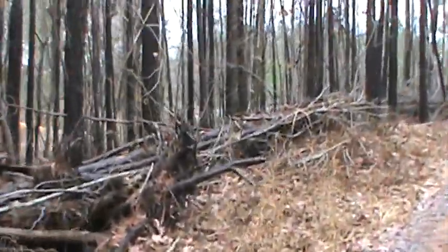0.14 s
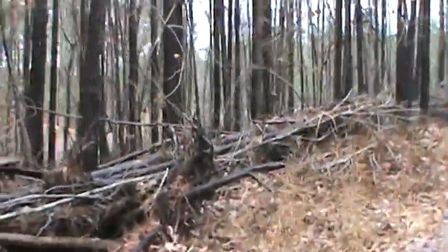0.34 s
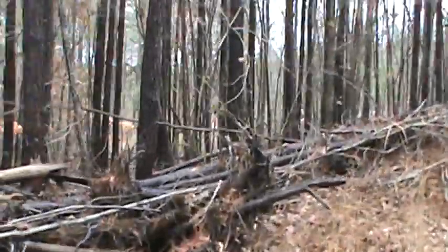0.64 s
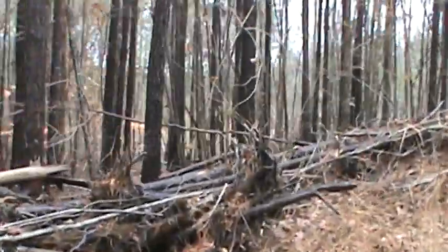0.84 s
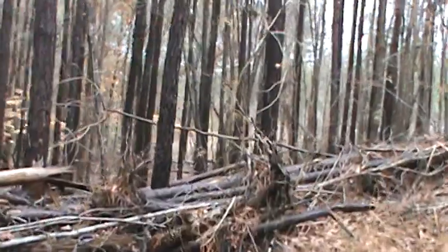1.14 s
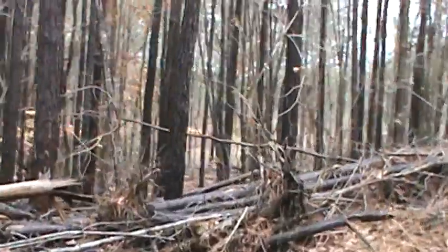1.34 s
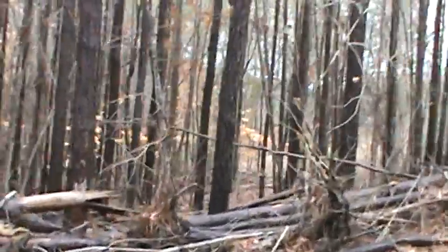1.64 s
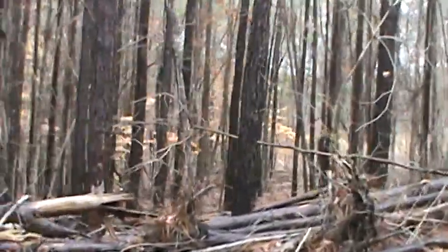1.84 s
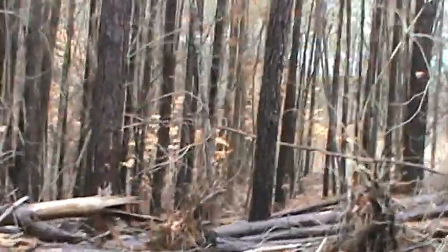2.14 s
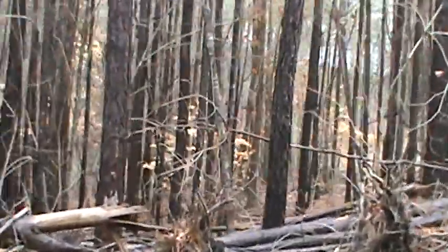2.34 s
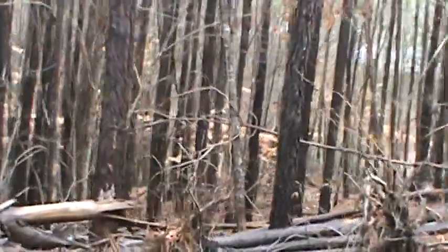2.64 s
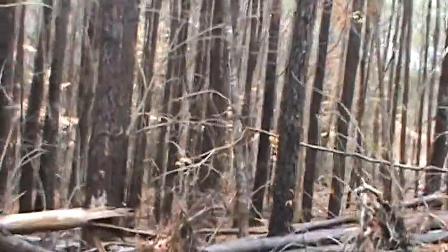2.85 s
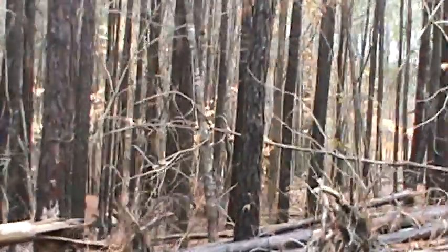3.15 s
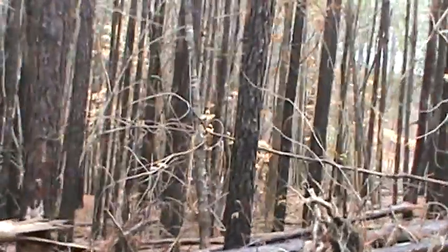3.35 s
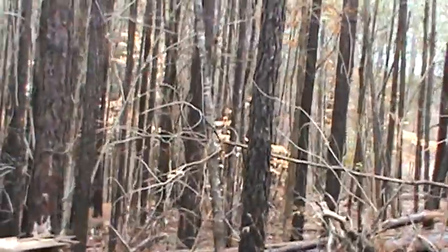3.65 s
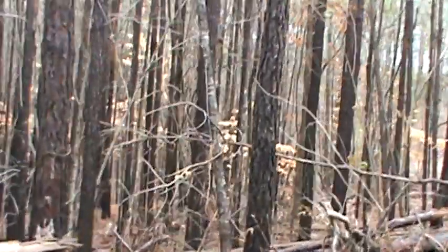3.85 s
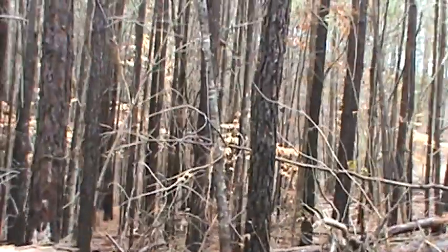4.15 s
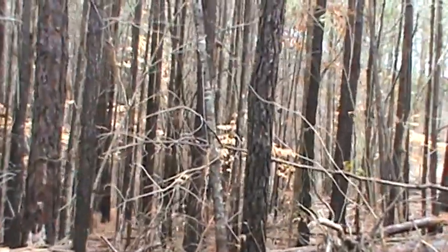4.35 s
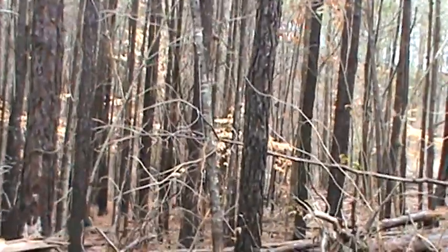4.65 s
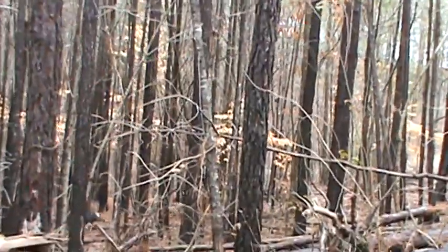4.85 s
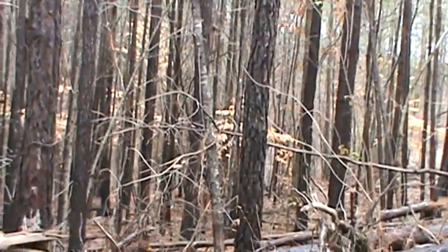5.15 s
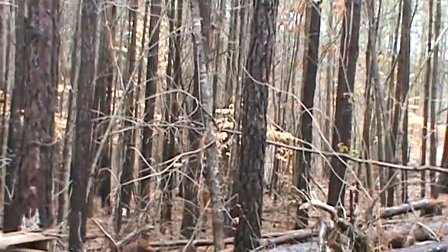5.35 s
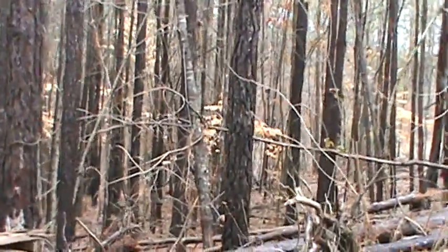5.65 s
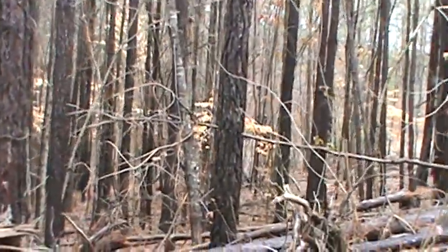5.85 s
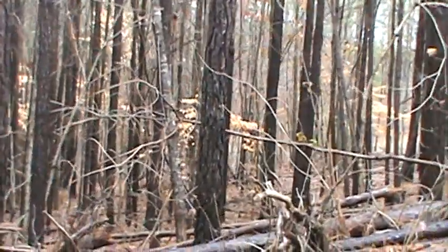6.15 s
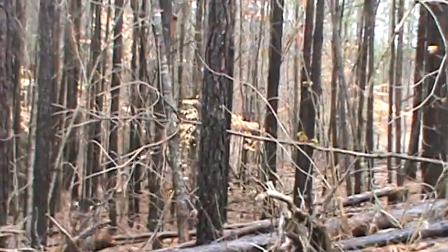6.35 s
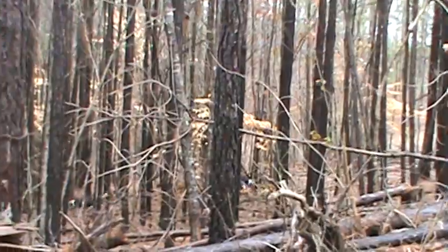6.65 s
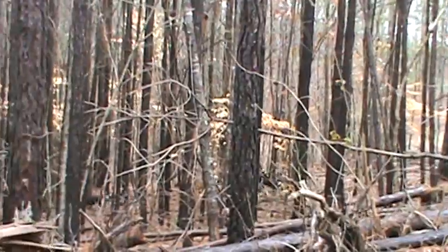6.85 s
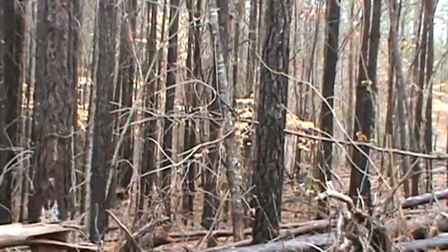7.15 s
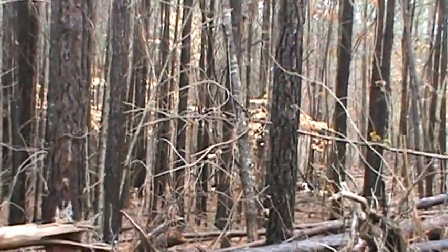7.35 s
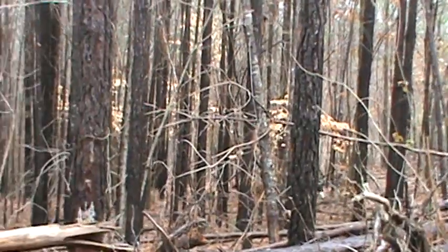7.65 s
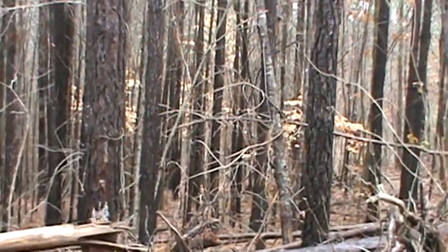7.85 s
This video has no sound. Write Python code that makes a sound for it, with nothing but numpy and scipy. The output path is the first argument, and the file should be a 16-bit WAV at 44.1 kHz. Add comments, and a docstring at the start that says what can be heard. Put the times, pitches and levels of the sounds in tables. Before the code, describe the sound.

Hunting dogs call in pine woods for eight seconds, each short bay or yip trailing an echo among the trunks. A hoarse, rasping hound and a high yipping one open, joined within half a second by a higher hound and a clear, steady one, all overlapping left of centre. A hand bumps the microphone dully at the start and several times around 0.7 seconds. Close by, dry leaves rustle underfoot and twigs snap from 0.3 seconds, again near 2 seconds, and loudest in a sharp cluster around 3 seconds. The leaves settle after 4 seconds. The clear hound stops just after 5 seconds; the others continue, sparser, slightly softer and nearer the middle, with one sharper yip at about 7.5 seconds. Faint outdoor hiss and a very thin, high electronic whine lie underneath throughout.

```python
"""Hounds on a trail in pine woods, 8 s, over faint air hiss and a thin electronic whine.
A hoarse hound and a yipping one open, as dry leaves rustle underfoot and a hand bumps the microphone
housing. A higher hound joins at 0.2 s, twigs snap from 0.3 s, a clear hound enters at 0.4 s. Each call is
vocal-fold tone plus rasp, scattered into a tail by the trunks. More bumps near 0.7 s; snaps peak near 3 s.
The leaves settle after 4 s, the clear hound stops after 5 s; the rest call on, now nearer the middle."""
import sys
import numpy as np
from scipy import signal
from scipy.fft import rfft, irfft, next_fast_len
from scipy.io import wavfile
from scipy.ndimage import uniform_filter1d, map_coordinates

SR = 44100
rng = np.random.default_rng(int(sys.argv[2]) if len(sys.argv) > 2 else 0)


def transcribe(signal):
    """Save signal, clipped to [-1, 1], as a 16-bit WAV file at the path in sys.argv[1]."""
    frames = np.atleast_2d(signal).T
    limited = np.clip(frames, -1, 1)
    pcm = np.round(limited * 32767).astype(np.int16)
    wavfile.write(sys.argv[1], SR, pcm)


N = 353241

# Levels are relative within each source; crest_s counts from the start of its call.
# open-air spectrum: freq_hz, density_db
AIR_SPECTRUM = [(15, -40), (25, -39), (70, -8), (250, -16.5), (500, -15), (1200, -14), (3200, -23),
                (7000, -21.5), (12000, -22.5), (15700, -37)]
# electronics whine: freq_hz, rms_db
WHINE_TONES = [(15734, -67)]
# throat response on the overtones: freq_hz, gain_db
THROAT_RESPONSE = [(1000, 0), (1300, 0), (1900, -9), (2600, -10), (3200, -21), (3800, -32), (5400, -46),
                   (7800, -56), (15000, -75)]
# rasp spectrum: freq_hz, density_db
RASP_SPECTRUM = [(450, -24), (700, 8), (880, -7.5), (1100, 2), (1300, 5), (1450, -4), (1680, -1),
                 (2070, -5.5), (2600, -5), (3050, -13.5), (3450, -23.5), (5350, -31), (7800, -23.5),
                 (11000, -31), (15500, -52)]
# decay among the trunks: freq_hz, t60_s
WOODS_DECAY = [(300, 2.45), (650, 0.84), (1300, 0.93), (2600, 0.77), (8000, 0.66)]
# hoarse bays: start_s, length_s, crest_s, tone_db, upper_db, opening_hz, held_hz, breakup_s
HOARSE_CALLS = [(0, .12, 0.039, -8, -14.5, 666.4, 636, 0.043),
                (0.15, 0.18, 0.12, -14, -20, 635.3, 664.5, .04),
                (0.655, 0.21, 0.068, -13, -18, 558.3, 663, 0.03),
                (0.8, .15, 0.08, -13, -15.5, 665, 648.3, 0.031),
                (1.13, .14, 0.016, -13.5, -16.5, 651, 664.2, 0.042),
                (1.41, 0.18, 0.051, -14.5, -16, 595.6, 630.7, 0.042),
                (1.76, 0.19, 0.06, -23, -17, 611.4, 614.2, .04),
                (1.91, 0.45, 0.025, -19.5, -24.5, 646.3, 658.4, 0.047),
                (2.4, 0.2, 0.038, -20.5, -19.5, 689.5, 633, 0.051),
                (2.54, 0.17, 0.03, -16, -18, 665, 656, 0.037),
                (2.9, 0.095, .03, -21.5, -25, 654, 692, 0.033),
                (2.97, 0.23, 0.092, -18, -18, 660, 663.5, 0.041),
                (3.29, 0.17, 0.056, -12.5, -12.5, 545.7, 651.6, 0.093),
                (3.44, 0.21, 0.11, -10, -13.5, 560, 675.7, .05),
                (3.93, 0.21, 0.068, -15, -15.5, 531.4, 643, 0.042),
                (4.29, .19, .08, -18, -14.5, 598, 642.6, 0.067),
                (4.68, 0.15, 0.043, -17, -18.5, 638.3, 639, 0.081),
                (5.22, .165, 0.085, -18, -15.5, 509.6, 644.4, 0.16),
                (5.44, 0.17, 0.069, -16.5, -17.5, 542.7, 673.3, 0.056),
                (6.165, 0.22, 0.098, -17.5, -18, 516, 661, 0.042),
                (6.615, 0.14, 0.051, -20, -15.5, 525.8, 677, 0.035),
                (6.915, 0.2, 0.1, -17, -15, 551, 670.4, 0.033),
                (7.27, 0.18, 0.14, -18, -17.5, 496.6, 650, 0.061),
                (7.68, 0.15, 0.13, -20.5, -19, 511, 638.4, 0.035),
                (7.89, .12, 0.17, -23.5, -23.5, 658, 644, 0.027)]
# scuffs in the leaves: peak_s, level_db, rise_s, fall_s
SCUFFS = [(0.01, -47, 0.084, .12), (0.3, -43.5, .05, 0.53), (0.44, -41, .04, 0.091), (0.614, -48, .03, .04),
          (0.706, -30.5, 0.019, 0.014), (0.76, -45.5, .1, 1), (1.426, -40, 0.032, 0.075),
          (1.79, -33.5, 0.044, 0.046), (1.914, -30.5, .05, 0.18), (2.508, -36, 0.18, 0.5),
          (2.882, -28, .14, 0.28), (3.02, -33.5, 0.17, 0.27), (3.25, -36.5, .25, 0.33),
          (3.69, -34.5, 0.17, 0.22), (3.77, -31.5, 0.4, 0.16)]
# dry-leaf spectrum: freq_hz, density_db
LEAF_SPECTRUM = [(2060, -6.5), (3500, -2.5), (6900, -1.5), (7820, -2), (9150, 1.5), (12700, -5),
                 (15700, -15)]
# yips: start_s, length_s, crest_s, tone_db, upper_db, opening_hz, top_hz, sag_hz, break_hz
YIP_CALLS = [(0.021, .1, 0.043, -21, -36, 1343, 1423, 1395, 1300),
             (0.216, 0.1, 0.034, -23.5, -33.5, 1373, 1430, 1395, 1350),
             (0.676, 0.16, 0.019, -17, -40, 1420, 1444, 1294, 1300),
             (0.838, 0.078, .03, -25, -43, 1324, 1400, 1353, 1270),
             (1.059, 0.096, 0.028, -20.5, -26.5, 1303, 1380, 1330, 1340),
             (1.369, 0.07, 0.019, -26, -24, 1370, 1391, 1368, 1400),
             (2.068, 0.15, 0.041, -24, -31.5, 1430, 1539, 1505, 1350),
             (2.782, .11, .025, -20, -23.5, 1383, 1483, 1436, 1326),
             (4.285, .095, .017, -20, -19, 1350, 1410, 1340, 1270),
             (5.57, .118, .03, -18.5, -28, 1360, 1300, 1225, 810),
             (7.521, .131, .032, -13.5, -21, 1150, 1670, 1310, 880), ]
# hand on the housing: start_s, level_db
HAND_BUMPS = [(0.026, -9.5), (0.06, -18), (0.671, -12), (0.699, -14.5), (0.734, -11.5), (0.764, -9),
              (0.813, -13.5), (0.842, -19)]
# higher bays: start_s, length_s, crest_s, tone_db, upper_db, opening_hz, held_hz
HIGH_CALLS = [(0.17, 0.081, 0.017, -13.5, -26, 705.5, 802), (0.55, 0.097, 0.055, -15, -28, 753, 762.5),
              (0.98, 0.23, 0.13, -19.5, -25.5, 738, 746), (1.36, 0.14, 0.14, -14, -29.5, 729, 788),
              (1.73, .07, .045, -15.5, -20.5, 735, 769.5), (1.92, 0.075, 0.02, -14.5, -23.5, 745, 773),
              (2.03, 0.14, 0.052, -18.5, -22, 775.6, 781), (2.38, .12, 0.021, -16.5, -19, 765, 755.4),
              (2.71, 0.16, 0.042, -19, -22.5, 761, 811), (3.03, 0.105, 0.051, -21.5, -27, 735, 790),
              (5.165, 0.08, 0.035, -27, -21.5, 880, 790), (6.2, 0.052, 0.022, -22, -26.5, 828, 807),
              (7.9, 0.13, 0.11, -23, -27, 722, 791)]
# breaking twigs: start_s, peak_db, resonance_hz
TWIG_SNAPS = [(0.2881, -26, 3530), (0.4398, -21, 10500), (0.6129, -25, 10400), (0.6913, -17, 7600),
              (0.7017, -9.5, 10300), (0.7518, -10, 10700), (1.728, -26, 3500), (1.8512, -19, 3770),
              (1.8846, -19, 4150), (1.908, -16.5, 4564), (2.0086, -13, 9700), (2.107, -18, 3550),
              (2.4986, -14, 7700), (2.9414, -5, 11300), (2.953, -7, 10100), (2.9646, -8, 10000),
              (2.984, -6, 3600), (2.9922, -10, 4270), (3.015, -0.5, 6350), (3.032, -8.5, 9300),
              (3.047, -14, 5660), (3.219, -16, 9450)]
# clear bays: start_s, length_s, crest_s, tone_db, upper_db, opening_hz, held_hz
CLEAR_CALLS = [(0.361, 0.18, 0.037, -14, -24, 595, 609.4), (1.551, 0.14, 0.16, -12.5, -18.5, 577.7, 602.3),
               (2.14, 0.15, 0.15, -11.5, -22.5, 626, 613), (2.691, 0.11, 0.07, -11.5, -25.5, 618, 597.7),
               (3.16, 0.15, 0.054, -14, -17.5, 602.5, 611.3),
               (3.718, 0.12, 0.078, -14, -16.5, 606.5, 626.7), (4.141, 0.1, 0.1, -11.5, -21.5, 604, 593),
               (4.639, 0.17, 0.041, -21, -25.5, 635.8, 641), (5.111, .14, 0.11, -19, -31, 636, 640)]
# bearing of the pack: time_s, left_minus_right_db
PACK_BEARING = [(0, 6.5), (1, 5), (2.502, 3), (5, 1.5), (8, 2)]

TOP_HZ = 15800
SCUFF_RANGE_DB = 22.5  # gained over rise_s, lost over fall_s
YIP_BREAK_S, FADE_EXPONENT = 0.022, 2.52


def amp(db):
    """dB to gain."""
    return 10 ** (np.asarray(db) / 20)


def unit(x):
    """Scale to rms 1."""
    return x / np.sqrt(np.mean(x ** 2) + 1e-20)


def along(points, hz):
    """Interpolate (freq_hz, value) points on a log axis."""
    freq_hz, values = np.transpose(points)
    return np.interp(np.log(hz + 1), np.log(freq_hz + 1), values)


def wobble(n, rate_hz):
    """Smooth random curve, knots at rate_hz."""
    knots = rng.standard_normal(int(n * rate_hz / SR) + 4)
    return map_coordinates(knots, [np.arange(n) * rate_hz / SR])


def filtered(x, response):
    """Apply response(hz) by FFT."""
    n = x.shape[-1]
    size = next_fast_len(n + 8192)
    return irfft(rfft(x, size) * response(np.fft.rfftfreq(size, 1 / SR)), size)[..., :n]


def coloured(x, spectrum):
    """Shape by a (freq_hz, db) spectrum; rms 1."""
    return unit(filtered(x, lambda hz: amp(along(spectrum, hz))))


def add(track, sound, start_s):
    """Mix in at start_s."""
    part = track[..., round(max(start_s, 0) * SR):][..., :sound.shape[-1]]
    part += sound[..., :part.shape[-1]]


def open_air():
    """Far hum and hiss."""
    mid, side = coloured(rng.standard_normal((2, N)), AIR_SPECTRUM)
    return amp(-52) * np.array([1.37 * mid + 1.4 * side, 2.03 * mid - 0.69 * side])


def whine():
    """Steady tone from the electronics."""
    t = np.arange(N) / SR
    return sum(np.sqrt(2) * amp(db) * np.sin(2 * np.pi * hz * t) for hz, db in WHINE_TONES)


def contour(row, swell_db, fade_db, attack_db, attack_s, sag_db, scoop_s=0):
    """Curves of one call: pitch scoops, fundamental swells and fades, upper voice attacks and sags."""
    start_s, length_s, crest_s, tone_db, upper_db, opening_hz, held_hz, *fall_hz = row
    t = np.linspace(0, length_s, num=40)
    before = lambda turn_s: np.clip(1 - t / turn_s, 0, 1)
    after = lambda turn_s: np.clip((t - turn_s) / max(length_s - turn_s, 1e-3), 0, 1)
    pitch_hz = held_hz + (opening_hz - held_hz) * before(scoop_s or crest_s) ** 2
    if fall_hz:  # yips only
        turns_s = [crest_s, max(length_s - YIP_BREAK_S, crest_s), length_s]
        pitch_hz += np.interp(t, turns_s, [held_hz, *fall_hz]) - held_hz
    tone_db = tone_db - swell_db * before(crest_s) ** 2 - fade_db * after(crest_s) ** FADE_EXPONENT
    upper_db = upper_db - attack_db * before(attack_s) - sag_db * after(attack_s) ** 2
    return start_s + t, pitch_hz, tone_db, upper_db


def vocal_folds(curves, jitter, shimmer_db, rasp_db, overtones_db=0, breath_db=0, breakup_s=0):
    """Unsteady fold tone, throat overtones and rasp; overtones give way to rasp over breakup_s, if set."""
    knots_s = curves[0]
    t = np.arange(knots_s[0], knots_s[-1], 1 / SR)
    n, age_s = len(t), t - t[0]
    pitch_hz, tone_db, upper_db = (np.interp(t, knots_s, curve) for curve in curves[1:])
    waver = 1 + jitter * wobble(n, 90.3) + 0.0083 * wobble(n, 17.9)
    pitch_hz = uniform_filter1d(pitch_hz, size=SR // 80) * waver
    phase = 2 * np.pi * np.cumsum(pitch_hz) / SR
    clarity = np.exp(-age_s / breakup_s) if breakup_s else 0.5

    k = np.arange(2, 13)[:, None]
    throat_db = along(THROAT_RESPONSE, k * pitch_hz) - along(THROAT_RESPONSE, 2 * pitch_hz)
    throat_db += shimmer_db * np.array([wobble(n, 64.3) for _ in k])
    offsets = rng.uniform(0, 2 * np.pi, k.shape)
    overtones = amp(throat_db) * (k * pitch_hz < TOP_HZ) * np.sin(k * phase + offsets)
    voice = amp(tone_db + shimmer_db * wobble(n, 70.2)) * np.sin(phase)
    voice += amp(upper_db + overtones_db) * (0.018 + 2 * clarity) * overtones.sum(0)

    halves = (k + 1) / 2  # strong and weak cycles alternate: lines at half-pitch spacing
    flicker = np.array([wobble(n, 85) for _ in k]) * np.where(k % 2, 1, 0.9)
    lines = amp(along(RASP_SPECTRUM, halves * pitch_hz)) * flicker * np.sin(halves * phase)
    airflow = 1 + 0.49 * np.sin(phase)
    turbulence = coloured(airflow * rng.standard_normal(n), RASP_SPECTRUM)
    rasp_gain = amp(upper_db + rasp_db + 2.2 * wobble(n, 44.7)) * 2 * (1 - clarity)
    rasp = rasp_gain * (unit(lines.sum(0)) + amp(breath_db) * turbulence)
    jaws = np.clip(np.minimum(age_s / 0.0069, (knots_s[-1] - t) / 0.0141), 0, 1)
    return (np.sqrt(2) * voice + rasp) * jaws


def in_woods(call, wet_db):
    """Direct call plus a tail scattered by the trunks, partly alike left and right."""
    hz, t, bins = signal.stft(rng.standard_normal((2, SR)), SR, nperseg=256)
    decay = amp(-60 * t / along(WOODS_DECAY, hz)[:, None])
    build_up = 1 - np.exp(-t / 0.0048)
    mid, side = signal.istft(bins * decay * build_up, SR, nperseg=256)[1]
    tail = np.array([mid + 0.55 * side, mid - 0.44 * side])
    out = amp(wet_db) * signal.fftconvolve(call[None], tail / np.linalg.norm(tail[0]), axes=1)
    out[:, :len(call)] += call
    return out


def hoarse_hound(track):
    """Bays that start clear, then break into rasp."""
    for *row, breakup_s in HOARSE_CALLS:
        curves = contour(row, swell_db=13, fade_db=16, attack_db=10.5, attack_s=0.039,
                         sag_db=11, scoop_s=0.09)
        call = vocal_folds(curves, jitter=0.011, shimmer_db=3, rasp_db=-6, overtones_db=-9,
                           breath_db=1, breakup_s=breakup_s)
        add(track, in_woods(call, wet_db=-4.5), row[0])


def leaf_rustle(cracks_per_s=900):
    """Dry leaves under a shifting foot: hiss made grainy by tiny cracks."""
    t = np.arange(N) / SR
    scuffs_db = [db - SCUFF_RANGE_DB * np.maximum((peak_s - t) / rise_s, (t - peak_s) / fall_s)
                 for peak_s, db, rise_s, fall_s in SCUFFS]
    hits = rng.random(N) < cracks_per_s / SR
    cracks = hits * amp(1.2 * rng.exponential(size=N)) * rng.standard_normal(N)
    hiss = rng.standard_normal(N) + 0.31 * unit(cracks)
    level_db = np.max(scuffs_db, axis=0) + 3 + 2 * wobble(N, 60)
    return amp(level_db) * coloured(hiss, LEAF_SPECTRUM)


def over_ground(x):
    """Stereo width of a patch of leaf litter."""
    spread = filtered(x, lambda hz: np.exp(3j * np.sin(hz / 300)))
    return np.array([x + 0.033 * spread, x - 0.13 * spread])


def yipping_hound(track):
    """Short, breathy yips: pitch tops out, sags, breaks."""
    for row in YIP_CALLS:
        curves = contour(row, swell_db=17, fade_db=6.5, attack_db=5.5, attack_s=0.033, sag_db=-0.5)
        call = vocal_folds(curves, jitter=0.02, shimmer_db=4, rasp_db=-10, breath_db=6)
        add(track, in_woods(call, wet_db=-4.5), row[0])


def hand_bumps(rise_s=0.004, t60_s=0.09):
    """Dull knocks carried through the housing."""
    out, t = np.zeros((2, N)), np.arange(SR // 20) / SR
    housing_hz_db = [(40, -17), (120, -1.5), (400, -0.5), (900, 1.5), (4000, -41)]
    for start_s, db in HAND_BUMPS:
        mid, side = coloured(rng.standard_normal((2, len(t))), housing_hz_db)
        envelope = amp(db - 4.5 - 60 * t / t60_s) * (1 - np.exp(-t / rise_s))
        add(out, envelope * np.array([1.77 * mid + 0.24 * side, 1.24 * mid - 0.32 * side]), start_s)
    return out


def high_hound(track):
    """Higher bays: unsteady folds, weak overtones, much breath."""
    for row in HIGH_CALLS:
        curves = contour(row, swell_db=7.5, fade_db=14.5, attack_db=2, attack_s=0.047,
                         sag_db=-2, scoop_s=0.0817)
        call = vocal_folds(curves, jitter=0.0282, shimmer_db=2.5, rasp_db=-4.5, overtones_db=-15,
                           breath_db=5.5)
        add(track, in_woods(call, wet_db=-3), row[0])


def twig_snaps(t60_s=0.0069, inverse_q=0.6):
    """Twigs break: each a noise burst through one broad resonance."""
    out, t = np.zeros(N), np.arange(SR // 100) / SR
    for start_s, peak_db, hz in TWIG_SNAPS:
        burst = rng.standard_normal(len(t)) * amp(-60 * t / t60_s)
        snap = filtered(burst, lambda f: 1j * f * hz / (hz * hz - f * f + 1j * f * hz * inverse_q))
        add(out, amp(peak_db) * snap / np.abs(snap).max(), start_s)
    return out


def clear_hound(track):
    """Even bays: steady folds, strong overtones."""
    for row in CLEAR_CALLS:
        curves = contour(row, swell_db=0.5, fade_db=5.5, attack_db=5, attack_s=0.047,
                         sag_db=2, scoop_s=0.1077)
        call = vocal_folds(curves, jitter=0.007, shimmer_db=1.5, rasp_db=-4, overtones_db=-2)
        add(track, in_woods(call, wet_db=-5), row[0])


def scene():
    """Pack moving from the left toward the middle, close noises, background."""
    pack = np.zeros((2, N))
    for hound in (clear_hound, hoarse_hound, high_hound, yipping_hound):
        hound(pack)
    pan_db = np.interp(np.arange(N) / SR, *np.transpose(PACK_BEARING)) / 2
    pack *= amp(-2.5) * amp([pan_db, -pan_db])
    underfoot = over_ground(leaf_rustle() + twig_snaps())
    return pack + underfoot + hand_bumps() + open_air() + whine()


def record(dry):
    """Gain control holds loud calls down, too slow for snaps; then clipping and band limit."""
    response_s, threshold_db = 0.015, -12
    pole = np.exp(-1 / (response_s * SR))
    power = signal.lfilter([1 - pole], [1, -pole], np.mean(dry ** 2, axis=0))
    rms = np.sqrt(power + 1e-12)
    gain = (1 + (rms / amp(threshold_db)) ** 4) ** (-1 / 4)
    return filtered(np.clip(dry * gain, -1, 1), lambda hz: hz < TOP_HZ)


dry = scene()
out = record(dry)
transcribe(out)
```